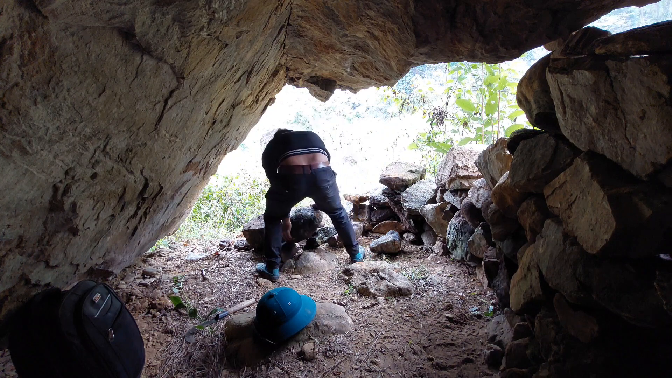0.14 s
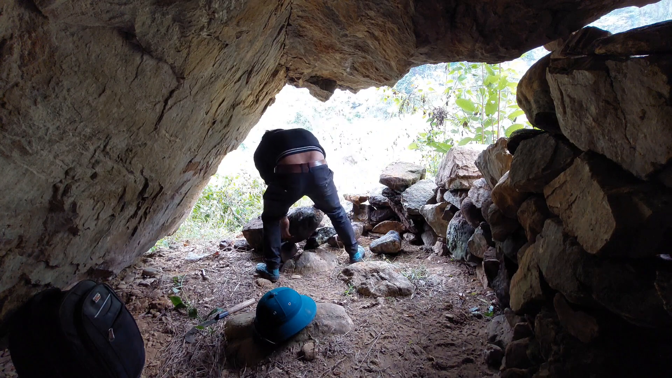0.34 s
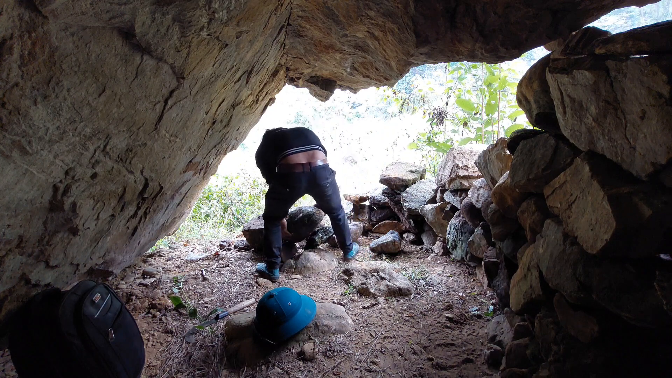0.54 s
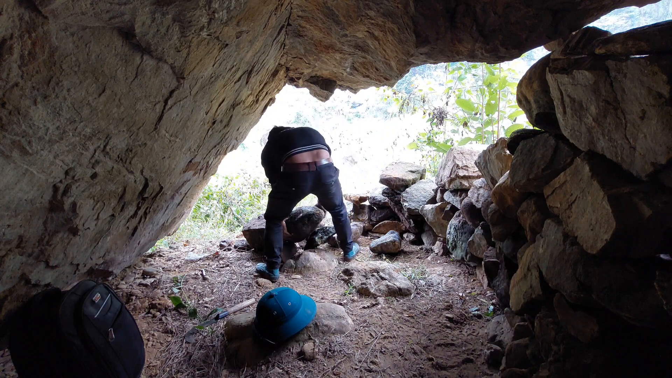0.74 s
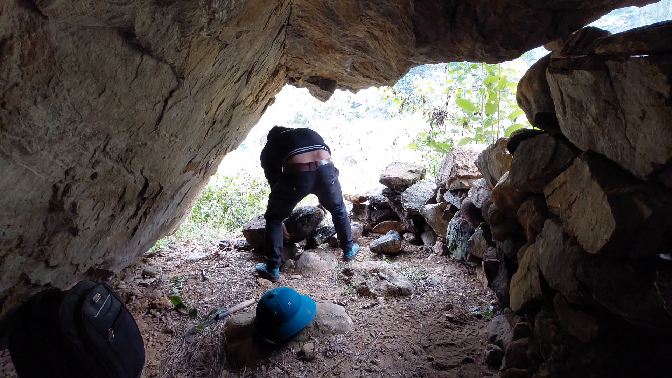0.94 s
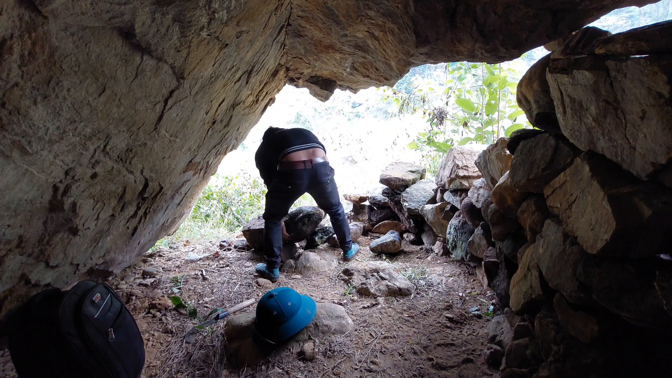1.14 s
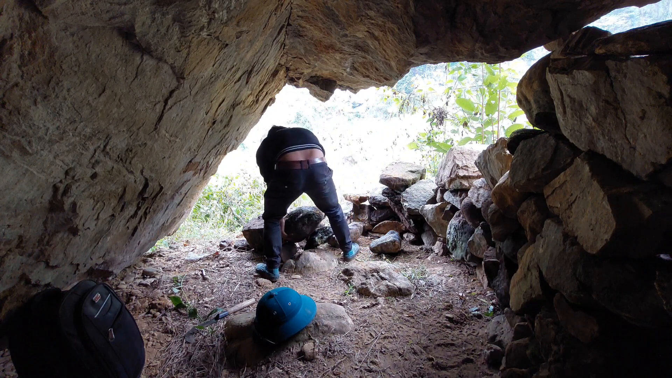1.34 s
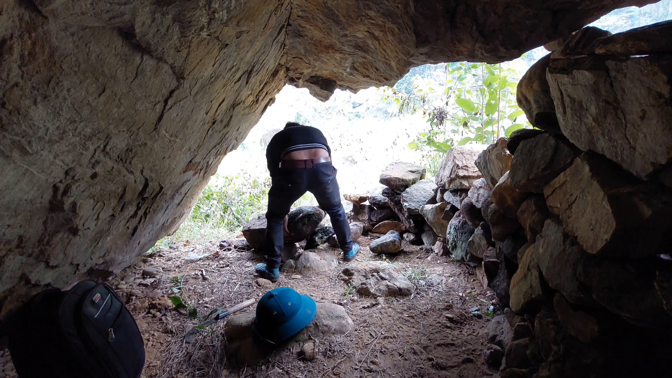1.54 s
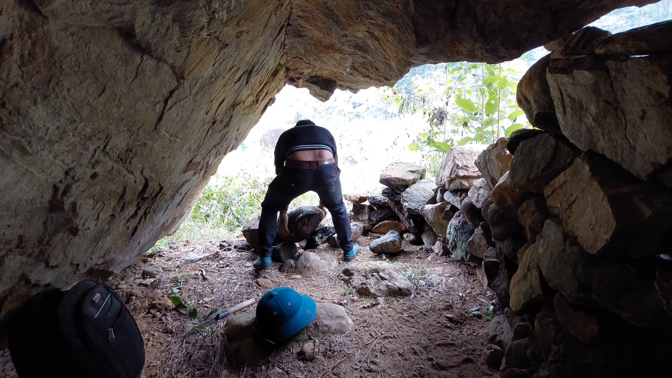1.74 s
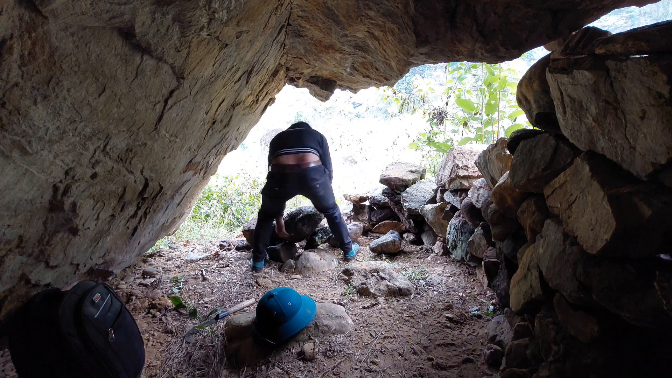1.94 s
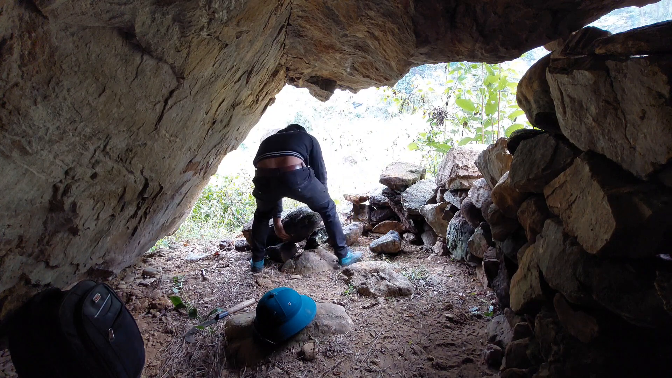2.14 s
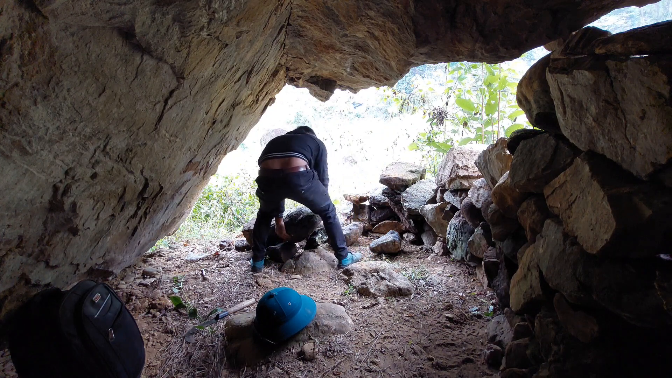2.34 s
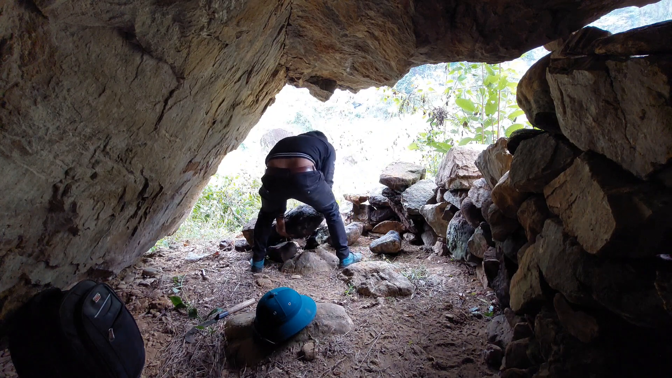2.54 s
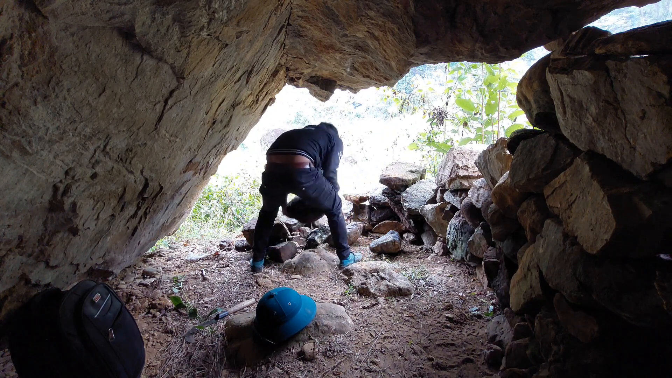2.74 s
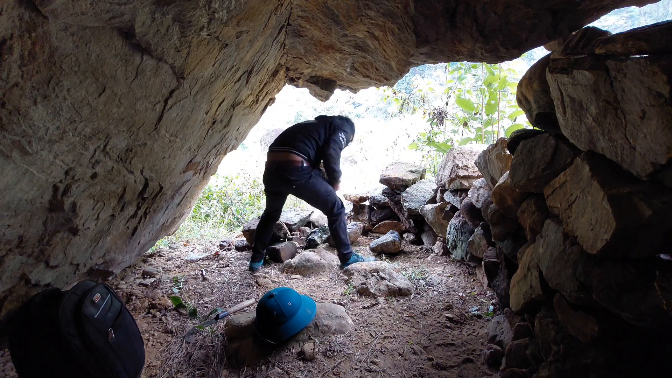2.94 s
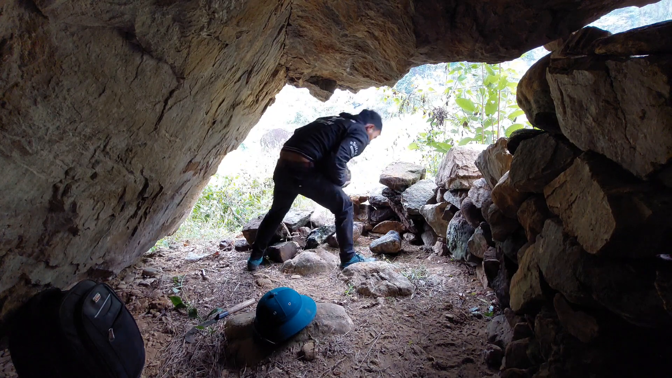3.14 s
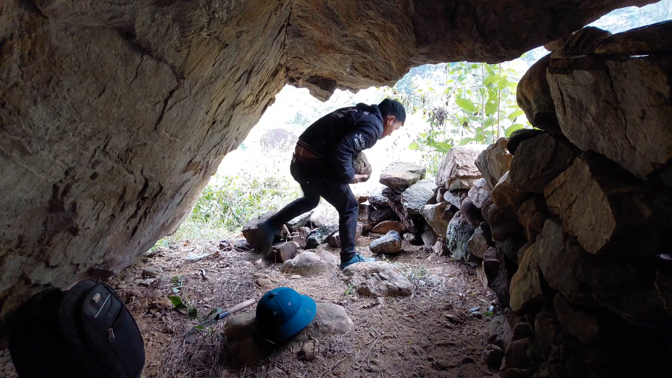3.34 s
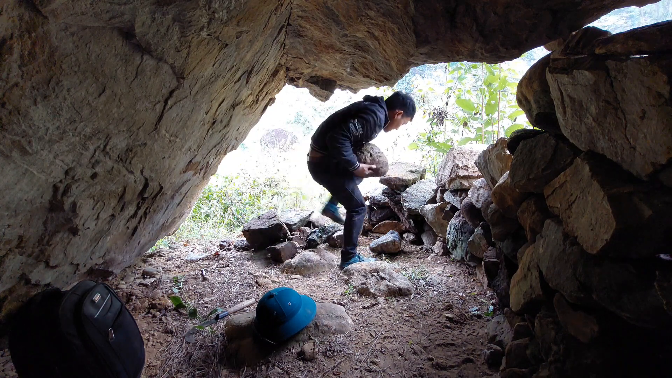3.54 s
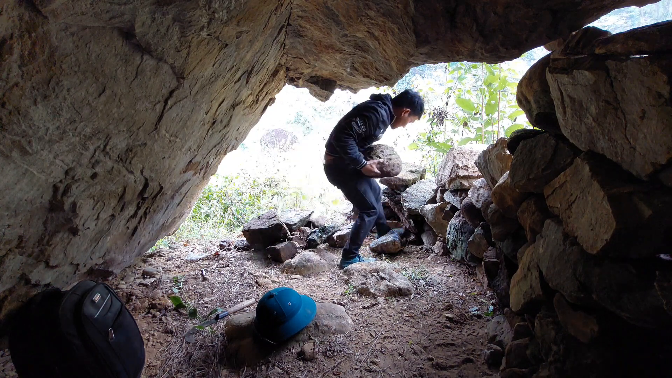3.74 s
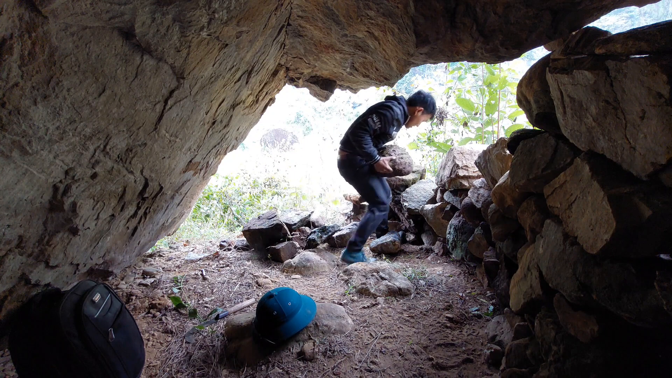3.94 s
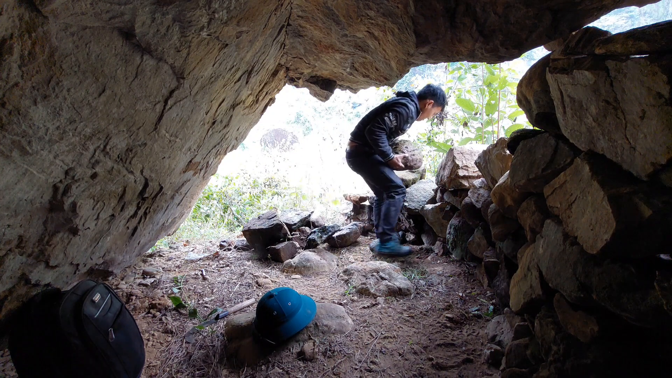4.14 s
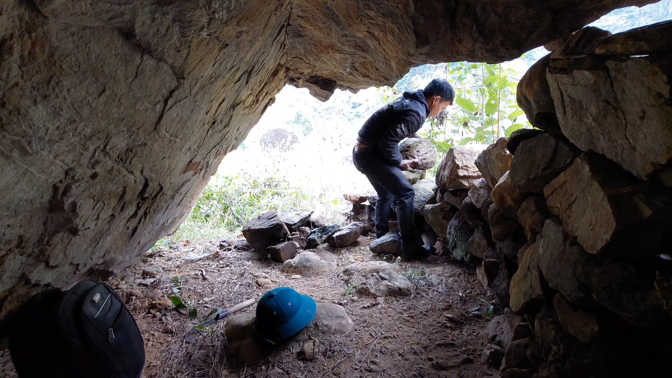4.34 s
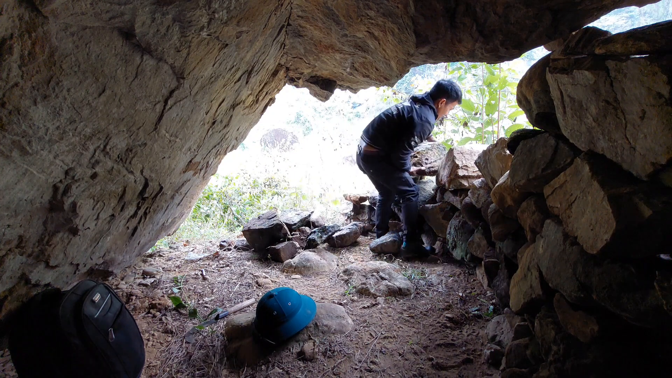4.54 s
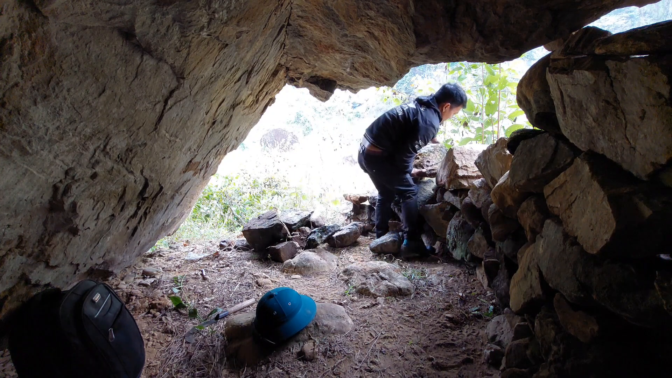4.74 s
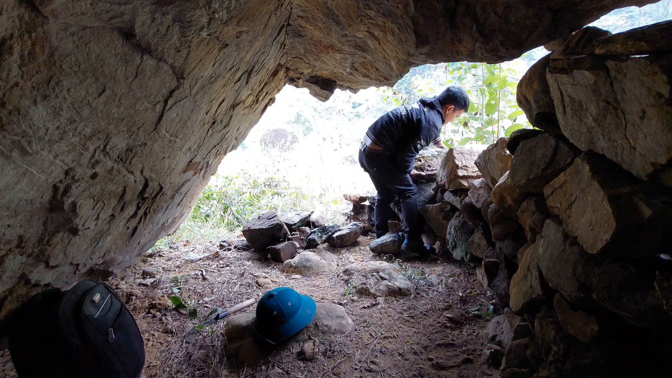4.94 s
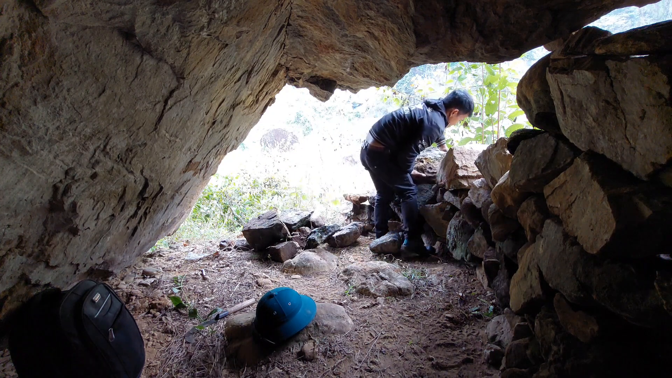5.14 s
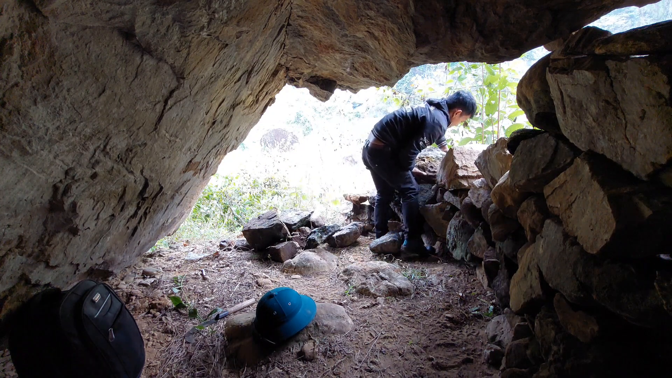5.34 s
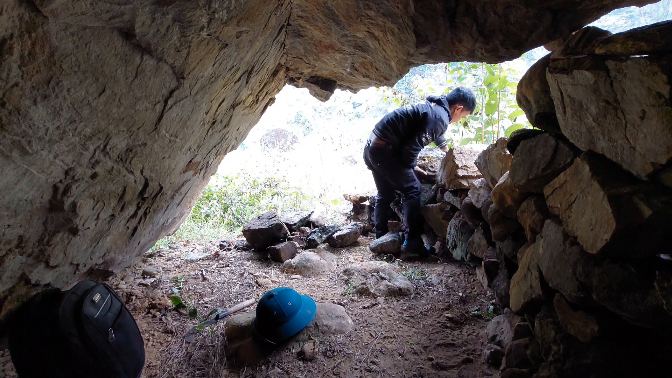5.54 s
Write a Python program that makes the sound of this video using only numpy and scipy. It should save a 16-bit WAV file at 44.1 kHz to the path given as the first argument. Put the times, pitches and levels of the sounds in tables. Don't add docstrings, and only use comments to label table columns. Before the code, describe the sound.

From the back of a rock shelter, a far river makes a soft, low wash, with an uneven deep rumble of air pressing on the opening. At 0 s a heavy stone strikes at once, the loudest moment: rapid hollow clacks, a sharp crack and a deep thud sinking into the ground, over by about 0.2 s. Smaller knocks and pebble ticks come at 0.45-0.6 s, then near quiet. Around 1.9-2.2 s the jacket rustles briskly, with faint clicks, a tiny pebble ring and stone faces parting; a weak knock follows at 2.4 s. From 2.8 to 3.7 s soft cloth swishes and gritty scrapes dominate. Light dull knocks and snaps fall at 3.8, 4.1 and 4.3 s. At 4.6 s a heavy stone lands with a low, hollow thump and settles in quick knocks; another firm clack and thud comes at 5.1 s. Rustle fades into river wash. Echoes are short and dry.

```python
import sys
import numpy as np
from scipy import signal
from scipy.fft import rfft, irfft, next_fast_len
from scipy.io import wavfile
from scipy.ndimage import uniform_filter1d

SR = 44100
rng = np.random.default_rng(int(sys.argv[2]) if len(sys.argv) > 2 else 0)


def gain_from_db(level_db):
    decades = np.asarray(level_db, float) / 20
    return 10 ** decades


def transcribe(u):
    v = np.clip(np.atleast_2d(u).T, -1, 1)
    q = np.round(v * 32767).astype(np.int16)
    wavfile.write(sys.argv[1], SR, q)


N = 250488

# f/Hz, level/dB per Hz
RIVER = [(56, -37), (95, -33), (124, 1), (170, -3), (202, -7), (243, -1.5), (299, -3.5), (488, -6.5),
         (546, -7.5), (697, -8), (1140, -14.5), (1920, -18.5), (2200, -20.5), (8500, -47.5), (11000, -52),
         (18700, -120)]
# f/Hz, level/dB per Hz
RUMBLE = [(11, -45), (18, -18), (59, 18), (78, 0.5), (85, -9.5), (92, -27), (100, -9), (130, -55),
          (220, -120)]
# t/s, rumble level/dB
PRESSURE = [(0.7, -45.5), (1.6, -48.5), (2.0, -44), (2.25, -50.5), (2.75, -44.5), (3.99, -45.5),
            (4.3, -52.5), (4.55, -40.5), (4.8, -46), (5.0, -40.5), (5.22, -42.5), (5.46, -49.5),
            (5.62, -45.5)]
# f/Hz, level/dB per Hz
HISS = [(4710, -33), (8000, -11), (10100, 2), (10500, -5), (11800, -2), (14900, -9), (15600, -6)]
RIVER_DB, HISS_DB = -46.5, -88.5

# peak t/s, level/dB, rise/s, fall/s (over STROKE_DB)
STROKES = [(0.0, -57, .05, 0.12), (0.115, -68.5, 0.28, 0.11), (0.5, -82, 0.18, 0.22),
           (0.575, -66.5, 0.12, 0.14), (0.76, -82, .1, 0.25), (1.8, -79, .17, 0.11),
           (1.917, -64.5, 0.0098, .1), (1.945, -55.5, 0.025, 0.041), (2.04, -70, .08, 0.083),
           (2.21, -58, 0.11, 0.083), (2.48, -81, 0.57, .25), (2.79, -65.5, 0.14, 0.37), (2.92, -75, .3, .3),
           (3.02, -63.5, .15, .07), (3.17, -75, .4, .4), (3.35, -59.5, 0.093, 0.06),
           (3.43, -61, 0.14, 0.071), (3.58, -69, .4, .3), (3.69, -64, 0.085, 0.23),
           (3.825, -61.5, .05, 0.016), (3.88, -77, .3, .3), (4.0, -70, 0.1, 0.091),
           (4.153, -64.5, 0.077, 0.18), (4.337, -67, 0.072, 0.093), (4.47, -78, .3, .3),
           (4.575, -75, .3, .2), (4.64, -67.5, 0.14, .065), (5.03, -79, 0.13, 0.12),
           (5.096, -74, 0.021, 0.12), (5.675, -88, 0.023, .1)]
STROKE_DB, STILL_DB = 20, -99
# f/Hz, level/dB per Hz
SIZZLE = [(5000, -6), (7000, -2.5), (8800, -6), (10500, -3.5), (13000, -3), (15500, -9), (17000, -18)]
# f/Hz, level/dB per Hz
SCRAPE = [(500, 3), (1200, 8), (2500, 4), (4500, 1), (6500, -3), (8500, -40), (11000, -8)]
GRIT_DB, GRIT_FOLLOWS = -53, 0.56

# t/s, clack level/dB, tock and crack level/dB against the clack, ring length/factor
BLOWS = [(0.0, -13, -7.5, -14.5, 0.58), (0.013, -14.5, -20, -19.5, 0.44), (0.055, -19.5, -8.5, -19, 0.59),
         (0.066, -29, -8, -9, 0.33), (0.096, -46, -1, -2.5, 0.93), (0.445, -41, -7, -12, 1.14),
         (0.565, -36, -3.5, -4.5, 0.62), (0.575, -41, -8, -14, 1.1), (1.935, -53, -8, 4, 1),
         (1.945, -43, 1, -7, 1.04), (2.197, -44, -6, 0.5, 1), (2.207, -43, -15, -9, 1.3),
         (2.44, -40, -7, -10, 0.76), (3.807, -40, -9.5, -14, 1.4), (3.817, -42, -7, -6, 1.1),
         (3.854, -38.5, -7, -22, 0.77), (4.077, -51, -13, -18, 1.3), (4.322, -39, -20, -6, 1.1),
         (4.588, -32, -13, -11.5, 1.64), (4.6, -34, 0, -23, 0.61), (4.615, -36.5, -2, 0.5, 0.39),
         (5.096, -31, -13, -14.5, 0.78), (5.104, -42.5, -5, -5, 0.66), (5.595, -73.5, -39, -38, 1)]
# f/Hz, level/dB, t60/s
CLACK = [(378, 1.5, 0.07), (317, -15, 0.073), (436, -2.5, 0.058)]
# f/Hz, level/dB, t60/s
TOCK = [(544.5, 1, 0.13), (504, -6, 0.055), (606, -9.5, 0.083)]
# f/Hz, level/dB, t60/s
CRACK = [(714, 3, 0.051), (862, 0.5, .06), (1036, 1, 0.025), (1314, 3, 0.018), (1610, -3, 0.019)]

# t/s, level/dB, f/Hz
KNOCKS = [(0.0, -26, 249), (0.015, -26, 241), (0.056, -20.5, 190), (0.063, -19.5, 313), (0.096, -32, 188),
          (0.405, -47, 240), (0.444, -35, 231), (0.566, -38.5, 220), (1.937, -40, 293), (2.205, -48, 281),
          (3.806, -38.5, 230), (3.842, -54, 196), (3.853, -34.5, 235), (3.877, -42, 250), (4.323, -34, 234)]
# t/s, level/dB, f/Hz
HEAVY_KNOCKS = [
    (4.587, -19.5, 225),
    (4.611, -30, 250),
    (4.628, -34, 248),
    (5.093, -25, 236),
]
# (s at -29.5 dB, factor per 10 dB louder)
KNOCK_SWELL, HEAVY_KNOCK_SWELL = (0.0048, 0.72), (0.0071, 1.01)

# t/s, peak level/dB, f/Hz
SNAPS = [(0.0004, -39.5, 13800), (0.592, -39.5, 13500), (0.5964, -48, 14200), (3.8038, -48, 14100),
         (3.8124, -46, 11000), (4.3241, -56, 12100), (4.4997, -55, 11700), (4.5171, -52, 12900),
         (4.5486, -47, 12000), (4.5855, -53, 13400), (4.9903, -41, 12100), (5.0943, -60, 11500)]
# t/s, peak level/dB
CRACKS = [
    (0.0004, -32),
    (2.178, -37.5),
    (2.1951, -39.5),
    (2.2114, -53),
    (2.2273, -43),
    (3.8038, -44),
    (3.8574, -59),
    (4.5861, -41.5),
    (5.0944, -53),
]
# t/s, peak level/dB
SHORT_CRACKS = [
    (0.591, -42.5),
    (4.5486, -49.5),
]
# t/s, peak level/dB, f/Hz
TICKS = [
    (0.5636, -46.5, 3220),
    (0.5744, -48, 3010),
    (1.9364, -47, 5740),
    (2.187, -51, 5080),
    (2.196, -53, 5200),
    (2.2274, -51, 3830),
    (3.421, -52, 6800),
]
# t/s, peak level/dB, f/Hz
SQUEAKS = [
    (3.976, -60, 11600),
    (3.995, -60, 12000),
    (4.222, -62, 11000),
    (4.312, -62, 11900),
    (4.335, -59, 12300),
]
SNAP_SHAPE, TICK_SHAPE, SQUEAK_SHAPE = (5600, 0.043), (1200, 0.048), (700, 0.15)  # (width Hz, t60 s)
CRACK_SHAPE, SHORT_SHAPE = (1280, 8400, 0.12), (6400, 4300, 0.04)  # (pitch Hz, width Hz, t60 s)

# f/Hz, t60/s
SHELTER = [(60, 0.57), (300, 0.12), (1500, 0.11), (6000, 0.13), (15000, 0.025)]

# t/s, level/dB, f/Hz
JOLTS = [
    (0.008, -17, 76.5),
    (0.467, -27.5, 75),
    (5.104, -19.5, 67.5),
    (5.132, -22, 66.4),
]
# t/s, level/dB, f/Hz
HEAVES = [(0.05, -24.5, 73.6), (0.096, -29, 61.5), (0.138, -30.5, 53.6), (0.176, -40.5, 54),
          (0.508, -32.5, 59.2), (0.579, -32.5, 58.5), (1.949, -38, 58.5), (2.432, -45, 60.4),
          (4.184, -36, 60.6), (4.239, -42, 50.3), (4.599, -22.5, 64.5), (4.628, -24.5, 59),
          (4.667, -31, 53), (5.169, -42, 70)]
JOLT_SWELL, HEAVE_SWELL = (0.0093, 0.77), (0.012, 0.87)

# t/s, level/dB, f/Hz
THUMPS = [(0.018, -19.5, 120), (0.07, -29.5, 123), (0.445, -30.5, 149), (0.467, -33, 113),
          (0.565, -36, 141), (1.94, -35, 115), (2.199, -44, 137), (3.806, -37, 153), (3.84, -37.5, 152),
          (3.869, -43, 153), (4.069, -48, 138), (4.334, -45, 141), (4.649, -38, 136)]
# t/s, level/dB, f/Hz
HEAVY_THUMPS = [
    (4.591, -27, 143),
    (4.613, -26, 131.4),
    (5.105, -31, 139),
]
THUMP_SWELL, HEAVY_THUMP_SWELL = (0.011, 0.77), (0.0146, 2.4)

# t/s, level/dB, f/Hz
RINGS = [
    (1.9354, -46, 2115),
    (2.1864, -47, 5030),
    (2.2283, -58, 3900),
    (3.176, -51, 3230),
    (3.81, -39, 1894),
    (3.8124, -60, 4270),
]
RING_SWELL = (0.0039, 1.3)

# f/Hz, correlation/1
SAME = [(60, 0.99), (100, 1), (180, 0.95), (310, 0.76), (550, 0.35), (950, -0.0056), (1650, -0.18),
        (2860, 0.12), (4970, 0.091), (8640, -0.19), (15000, 0.071)]
# f/Hz, left minus right level/dB
LEAN = [(60, 0.5), (95, -1.5), (150, 0.5), (240, 1.0), (380, 2.5), (600, -5), (950, -4), (1500, -1),
        (2380, 1), (3770, 0.5), (5980, 3.5), (9470, 1), (15000, 1)]
EDGE_HZ = 15500


def evened(x):
    return x / np.sqrt(np.mean(x ** 2) + 1e-20)


def read(points, hz):
    f, value = np.transpose(points)
    return np.interp(np.log(hz + 1), np.log(f + 1), value)


def add(mix, s, sound):
    part = mix[..., max(round(s * SR), 0):][..., :sound.shape[-1]]
    part += sound[..., :part.shape[-1]]


def colour(x, gain):
    size = next_fast_len(x.shape[-1] + 4096)
    spectrum = rfft(x, size) * gain(np.fft.rfftfreq(size, 1 / SR))
    return irfft(spectrum, size)[..., :x.shape[-1]]


def wash(spectrum, patchy_db, swell_db):
    frames, hz = N // 512 + 5, np.fft.rfftfreq(2048, 1 / SR)
    a, b, c, d, patches = rng.standard_normal((frames, 1025, 5)).T
    patches = uniform_filter1d(patches, size=20, axis=0)
    patches = evened(uniform_filter1d(patches, size=6, axis=1))
    swell = evened(uniform_filter1d(rng.standard_normal(frames), size=30))
    field_db = read(spectrum, hz)[:, None] + patchy_db * patches + swell_db * swell
    z = np.array([a + 1j * b, c + 1j * d]) * gain_from_db(field_db)
    return evened(signal.istft(z, nperseg=2048, noverlap=1536)[1][:, :N])


def river():
    s, rumble_db = np.transpose(PRESSURE)
    pressure = gain_from_db(np.interp(np.arange(N) / SR, s, rumble_db))
    rumble = pressure * wash(RUMBLE + [(200, -67)], 0.18, 0.22)
    water = gain_from_db(RIVER_DB) * wash(RIVER, 0.64, 0.47)
    hiss = gain_from_db(HISS_DB) * wash(HISS, 0.4, 0.3)
    return water + rumble + hiss


def movement_db():
    t, power = np.arange(N) / SR, gain_from_db(STILL_DB) ** 2
    for s, db, rise, fall in STROKES:
        distance = np.maximum((s - t) / max(rise, 0.01), (t - s) / max(fall, 0.01))
        power = power + gain_from_db(db - STROKE_DB * distance) ** 2
    return 10 * np.log10(power)


def grains(per_s, spread_db):
    size = gain_from_db(spread_db * np.minimum(rng.exponential(1, (2, N)), 4))
    signed = size * rng.choice([-1., 1.], (2, N))
    return signed * (rng.random((2, N)) < per_s / SR)


def rustle():
    move_db = movement_db()
    sizzle = evened(colour(grains(5000, 1.8), lambda hz: gain_from_db(read(SIZZLE, hz))))
    scrape = evened(colour(grains(3000, 3.2), lambda hz: gain_from_db(read(SCRAPE, hz))))
    grit_db = GRIT_DB + GRIT_FOLLOWS * (move_db + 58.5)
    return gain_from_db(move_db + 3.2) * sizzle + gain_from_db(grit_db) * scrape


def blows():
    out, t = np.zeros(N), np.arange(SR // 4) / SR
    groups = [CLACK, TOCK, CRACK]
    detune = rng.uniform(-0.83, 1, (len(BLOWS), sum(map(len, groups))))
    for (s, clack_db, tock_db, crack_db, ring), bend in zip(BLOWS, detune):
        shares_db = [0, tock_db + 2.5, crack_db + 4.0]
        modes = [(hz, db + share, t60) for group, share in zip(groups, shares_db) for hz, db, t60 in group]
        hz, db, t60 = np.transpose(modes)[:, :, None]
        hz = hz * (1 + 0.059 * bend[:, None])
        swell = 1 - np.exp(-t * hz / 0.61)
        decay = gain_from_db(db - 60 * t / (t60 * np.clip(ring, 0.3, 3)))
        rings = decay * swell * np.sin(2 * np.pi * hz * t)
        add(out, s, gain_from_db(clack_db + 1.0) * rings.sum(0))
    return out


def standing(rows, swell, damping, gain_db):
    out, t = np.zeros(N), np.arange(SR // 2) / SR
    for s, db, hz in rows:
        swell_s = np.clip(swell[0] * swell[1] ** ((db + 29.5) / 10), 0.001, 0.05)
        u = t / swell_s
        envelope = (u * np.exp(1 - u)) ** damping
        add(out, s, gain_from_db(db + gain_db) * envelope * np.sin(2 * np.pi * hz * t))
    return out


def knocks():
    light = standing(KNOCKS, KNOCK_SWELL, 1.0, 0.26)
    return light + standing(HEAVY_KNOCKS, HEAVY_KNOCK_SWELL, 1.0, 0.52)


def snaps():
    kinds = [(SNAPS, SNAP_SHAPE), (CRACKS, CRACK_SHAPE), (SHORT_CRACKS, SHORT_SHAPE), (TICKS, TICK_SHAPE),
             (SQUEAKS, SQUEAK_SHAPE)]
    rows = [(*row, *shape) for table, shape in kinds for row in table]
    out, t = np.zeros((2, N)), np.arange(SR // 6) / SR
    edge = np.minimum(t / 0.0004, 1) * (1 + 1.2 * np.exp(-t / 0.002))
    noise = rng.standard_normal((len(rows), 2, len(t)))
    for (s, db, pitch_hz, width, t60), n in zip(rows, noise):
        band = evened(colour(n, lambda hz: 1 / (1 + (2 * (hz - pitch_hz) / width) ** 4)))
        decay = gain_from_db(db - 8.5 - 60 * t / np.clip(t60, 0.02, 0.35))
        add(out, s, decay * band * edge)
    return out


def shelter(x):
    taps = np.zeros((2, SR // 2))
    at = np.arange(60, SR // 2 - 20, 20) + rng.integers(0, 20, (2, (SR // 2 - 61) // 20))
    np.put_along_axis(taps, at, rng.choice([-1., 1.], at.shape), 1)
    hz, t, z = signal.stft(taps, SR, nperseg=512)
    t60 = np.maximum(read(SHELTER, hz), 0.02)[:, None]
    tail = signal.istft(z * gain_from_db(-60 * t / t60), SR, nperseg=512)[1]
    return signal.fftconvolve(x[None], tail / np.linalg.norm(tail[0]), axes=1)[:, :N]


def sinking():
    return standing(HEAVES, HEAVE_SWELL, 1.25, 1.8) + standing(JOLTS, JOLT_SWELL, 1.6, 1.2)


def thumps():
    light = standing(THUMPS, THUMP_SWELL, 2.25, 0.77)
    return light + standing(HEAVY_THUMPS, HEAVY_THUMP_SWELL, 1.55, 0.6)


def pebble_rings():
    return standing(RINGS, RING_SWELL, 0.33, -2.8)


def scene():
    stones = blows() + knocks() + pebble_rings()
    turned = signal.hilbert(stones).imag
    direct = np.array([stones, gain_from_db(-5.5) * turned])
    field = direct + gain_from_db([[-13.0], [-4.5]]) * shelter(stones)
    return field + thumps() - sinking() + river() + rustle() + snaps()


def roll_off(x):
    return signal.sosfilt(signal.butter(12, 15560, fs=SR, output="sos"), x)


def record(dry):
    same = lambda hz: np.clip(read(SAME, hz), -1, 1)
    differs = lambda hz: np.sqrt(1 - same(hz) ** 2)
    right = colour(dry[0], same) + colour(dry[1], differs)
    lean = lambda hz: gain_from_db(np.outer([0.5, -0.5], read(LEAN, hz))) / (1 + (hz / EDGE_HZ) ** 400)
    mix = colour(np.array([dry[0], right]), lean)
    return roll_off(mix)


dry = scene()
out = record(dry)
transcribe(out)
```